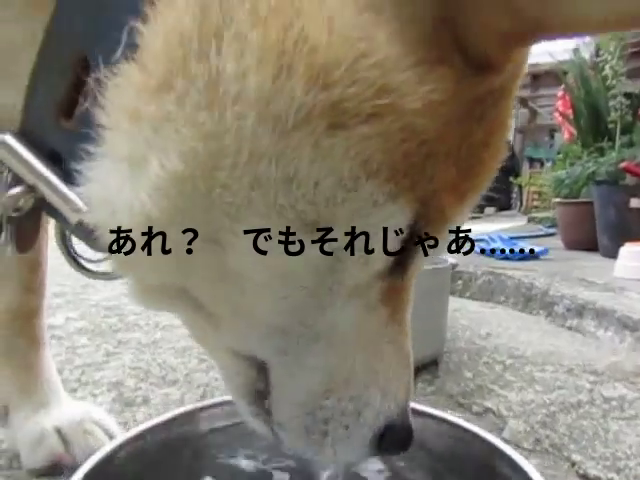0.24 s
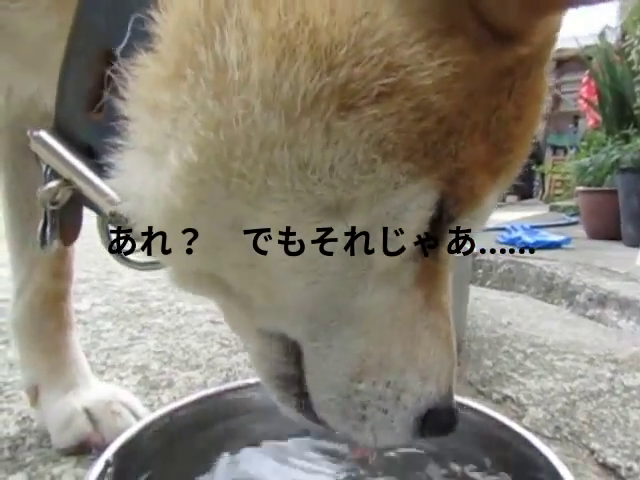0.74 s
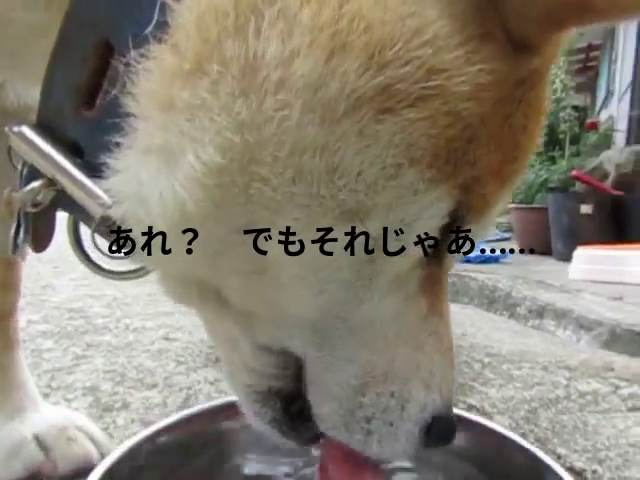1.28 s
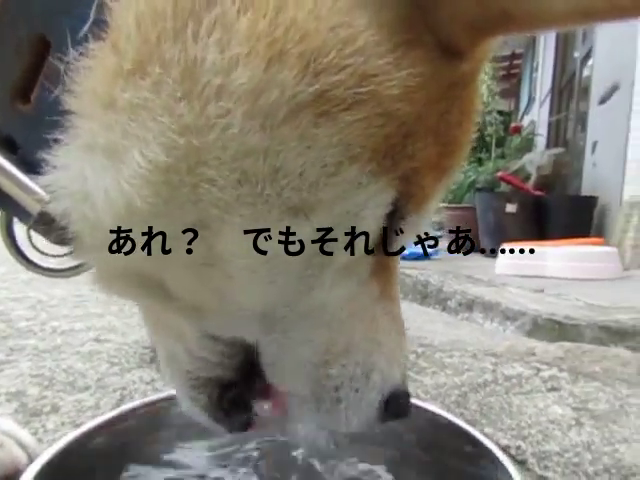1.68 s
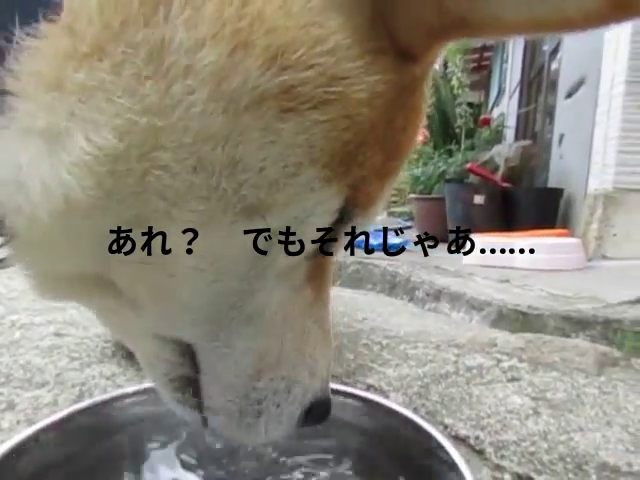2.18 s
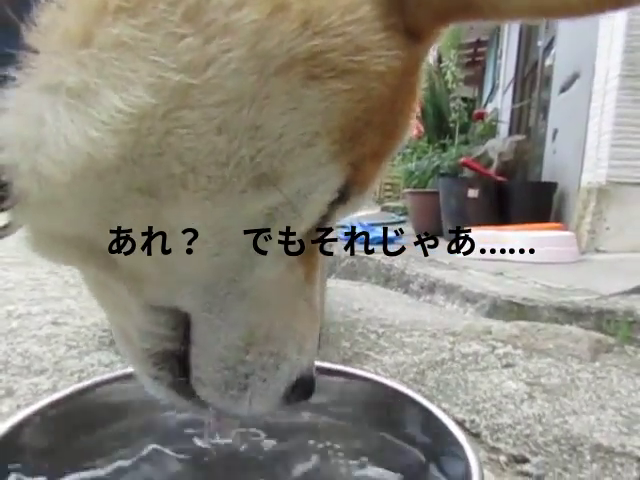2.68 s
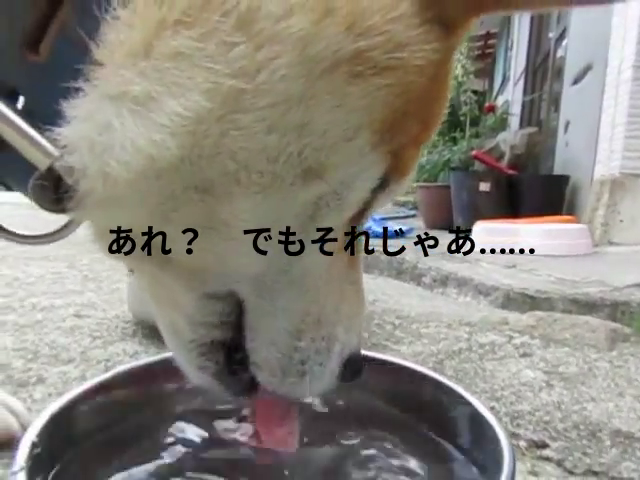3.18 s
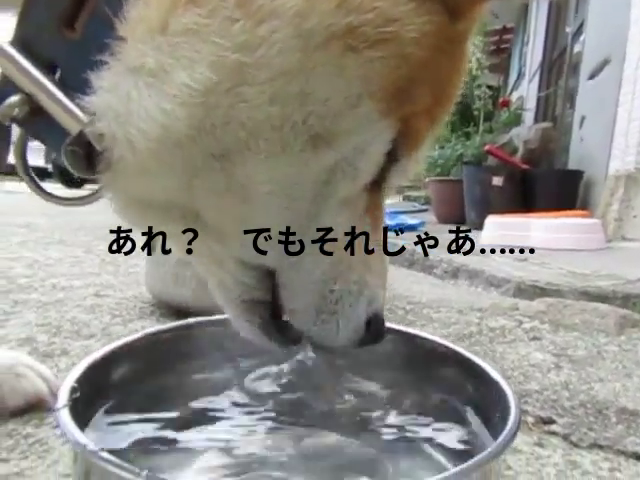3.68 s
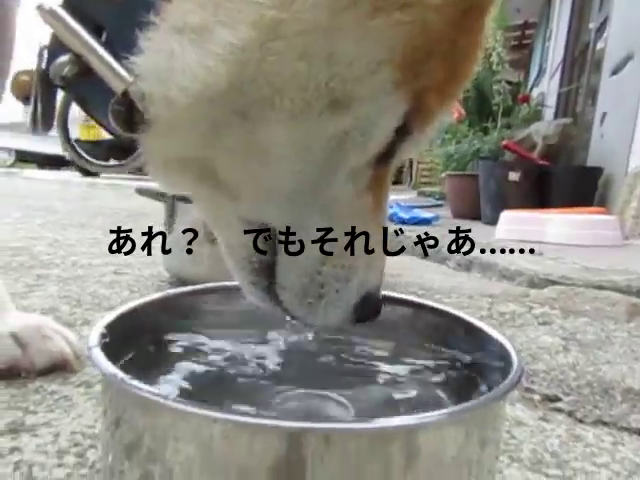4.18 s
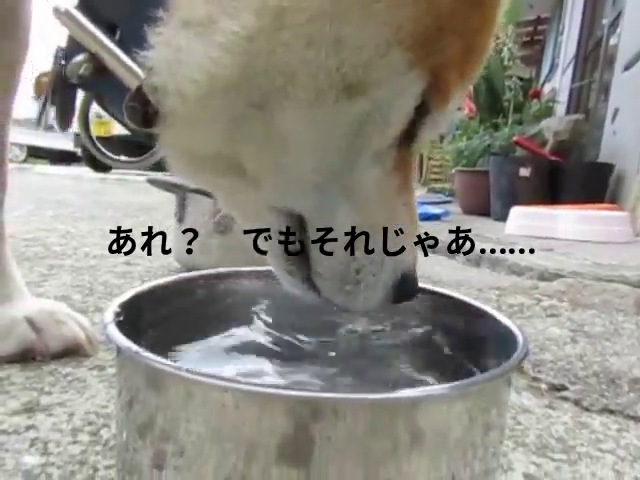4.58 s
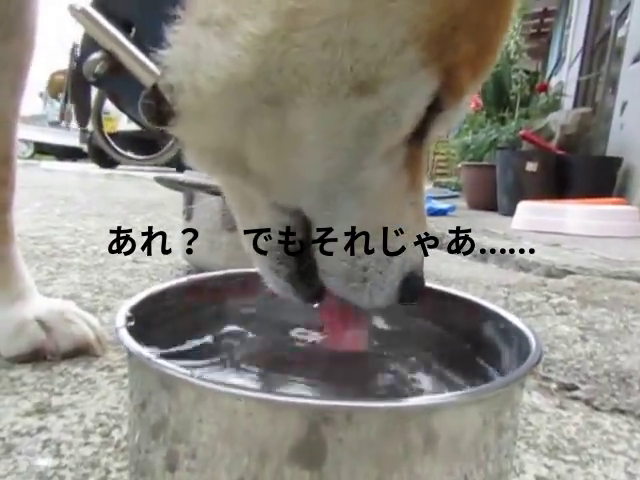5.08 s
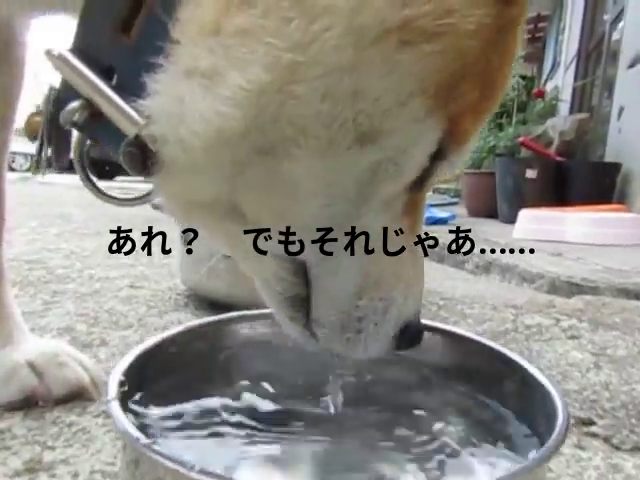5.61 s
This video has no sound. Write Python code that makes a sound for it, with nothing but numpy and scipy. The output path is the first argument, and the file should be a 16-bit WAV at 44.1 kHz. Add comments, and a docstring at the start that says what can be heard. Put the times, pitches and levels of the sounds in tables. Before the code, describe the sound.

After a brief silence, about fifteen quick laps of water run through to the end, close and dry. Small bubbles fizz and larger ones pop at each double-beat of tongue and jaws, coloured by the bowl. Bright stray-drop ticks appear from the second second onward, with faint high clinks, slight nasal whistles and low background hum.

```python
"""A dog laps water from a steel bowl on a concrete yard, heard close up.
Each lap is a dip of the tongue, a lift and a snap of the jaws: swarms of small decaying sine bubbles,
with a few large ones plopping out, and quick echoes and a short ring from the bowl.
Stray drops tick as coloured noise bursts, metal clinks faintly as decaying modes, and thin airy whistles
of resonant noise come and go over an outdoor hush of shaped noise with a low hum and a faint high whine."""
import sys
import numpy as np
from scipy import signal
from scipy.fft import rfft, irfft
from scipy.io import wavfile
from scipy.ndimage import uniform_filter1d

SR = 44100
rng = np.random.default_rng(int(sys.argv[2]) if len(sys.argv) > 2 else 0)


def generate_wav(sig):
    """Save sig (samples, or channels by samples) to the path in sys.argv[1] as 16-bit PCM at SR."""
    pcm = np.round(np.clip(np.atleast_2d(sig).T, -1, 1) * 32767).astype(np.int16)
    wavfile.write(sys.argv[1], SR, pcm)


N = 257984  # samples


def amp(db):
    """Decibel law: level to amplitude ratio."""
    return 10 ** (np.asarray(db) / 20)


def unit_rms(x):
    """Power normalisation: scales a signal to an rms of 1."""
    return x / np.sqrt(np.mean(x ** 2) + 1e-20)


def read(points, hz):
    """Log-frequency interpolation: joins the points of a short spectrum by straight lines."""
    point_hz, value = np.transpose(points)
    return np.interp(np.log(hz + 1), np.log(point_hz + 1), value)


def add(mix, start_s, sound):
    """Superposition: sums a sound into the mix from its start time."""
    part = mix[max(round(start_s * SR), 0):][:len(sound)]
    part += sound[:len(part)]


def coloured(x, points):
    """Linear filtering: weights the spectrum of a sound by the levels of the points."""
    hz = np.fft.rfftfreq(len(x), 1 / SR)
    return irfft(rfft(x) * amp(read(points, hz)), len(x))


def drift(rate_hz):
    """Random modulation: low-passed noise gives a slow fluctuation of rms 1."""
    hz = np.fft.rfftfreq(N, 1 / SR)
    smoothed = rfft(rng.standard_normal(N)) * np.exp(-(hz / rate_hz) ** 2)
    return unit_rms(irfft(smoothed, N))


# shape of the outdoor hush: (frequency [Hz], relative density [dB per Hz])
HUSH_SPECTRUM = [(20, -22), (45, -9), (100, -3), (160, 0.5), (340, -3.5), (750, -10.5), (1300, -8.5),
                 (2300, -11.5), (6400, -23.5), (8200, -22.5), (10300, -22), (13200, -23.5), (15000, -32.5)]
HUSH_DB = -46  # rms
# steady tones, low hum and high whine: (frequency [Hz], mean rms level [dB])
HUM_TONES = [(100, -55), (10893, -73.5)]


def yard(swell_db=0.32, waver_db=1.0, wander=0.00183):
    """Ambient noise: a shaped-noise hush, with a hum and a whine that waver in level and pitch."""
    level = amp(HUSH_DB + swell_db * drift(1.7))
    hush = level * unit_rms(coloured(rng.standard_normal(N), HUSH_SPECTRUM))
    time = np.cumsum(1 + wander * drift(42)) / SR  # one clock shared by both tones
    hum = np.zeros(N)
    for hz, db in HUM_TONES:
        hum += amp(db + waver_db * drift(6.8)) * np.sqrt(2) * np.sin(2 * np.pi * hz * time)
    return hush + hum


# laps of the tongue: (touch of the water [s], delay to the lift [s], delay to the bite [s],
#   dip level [dB], lift level [dB], bite level [dB], extra small bubbles [dB], pitch of pocket under tongue [Hz])
LAP_TIMES = [(0.13, 0.043, 0.13, -32.5, -40, -32.5, 0.5, 1690),
             (0.603, 0.047, 0.12, -35, -43.5, -35.5, 0.5, 1620.0),
             (0.935, 0.054, 0.16, -41, -42, -33, 1, 2000),
             (1.33, 0.089, 0.14, -30.5, -36.5, -40.5, -5.5, 1510),
             (1.697, 0.038, 0.12, -37.5, -41, -33.5, 2.0, 1490),
             (2.068, 0.054, 0.12, -36.5, -42, -34.5, -0.5, 1600.0),
             (2.436, 0.045, 0.12, -43, -38.0, -32, -1.0, 1900.0),
             (2.91, 0.058, 0.13, -38.5, -43.5, -36.0, 0.0, 1800),
             (3.269, 0.071, 0.12, -36.5, -41.0, -38.0, 1.0, 1700.0),
             (3.64, 0.07, 0.13, -35.0, -40.5, -37, -0.5, 3090),
             (3.981, 0.067, 0.136, -38.0, -37.5, -34.5, -4, 1600),
             (4.47, 0.088, 0.14, -36.5, -42.5, -38.5, 0, 840.0),
             (4.803, 0.039, 0.12, -33.5, -39.5, -35.0, -0.5, 1900),
             (5.149, 0.036, 0.12, -43, -38.5, -33.0, 0.5, 840),
             (5.518, 0.041, 0.116, -45.5, -42.5, -37.5, -1.0, 2000.0)]
# stirring by each part of a lap, rise and fall being times to 1/e of the peak power (sign ignored):
# (rise [s], fall [s], large bubbles [dB], medium bubbles [dB], small bubbles [dB])
DIP_STIR = (.006, .016, -7, -1.2, -5.5)
LIFT_STIR = (0.0263, 0.0629, -4, 0.24, -3)
BITE_STIR = (0.0155, 0.012, -0.5, 1.6, -5.5)
SETTLE_STIR = (-0.06, .07, -18, -16.5, -25)
DIP_PEAK_S, SETTLE_S = 0.0041, 0.07  # dip peak after the touch, falling water after the bite


def stirring(entry=2.5, settle=1.6):
    """Energy input: bubble power in three sizes as the tongue dips and lifts water, jaws bite, the rest falls."""
    t, power = np.arange(-SR // 4, SR // 2) / SR, np.zeros((3, N))
    for start, lift_s, close_s, dip_db, lift_db, bite_db, fizz_db, _ in LAP_TIMES:
        bite_at = start + close_s
        parts = [(start + DIP_PEAK_S, dip_db, DIP_STIR), (start + lift_s, lift_db, LIFT_STIR),
                 (bite_at, bite_db, BITE_STIR), (bite_at + SETTLE_S, bite_db, SETTLE_STIR)]
        for peak_s, db, (rise_s, fall_s, large_db, medium_db, small_db) in parts:
            before, after = abs(t / rise_s) ** entry, abs(t / fall_s) ** settle
            swell = np.exp(-np.where(t < 0, before, after))[t >= -peak_s]
            for band, size_db in zip(power, (large_db, medium_db, small_db + fizz_db)):
                add(band, peak_s + t[0], amp(db + size_db) ** 2 * swell)
    return power


def bubble(hz, decay_ms, rise, onset_ms):
    """Bubble resonance: a pocket of air rings and dies, its pitch rising (share per s). Envelope peak 1."""
    t = np.arange(SR // 25) / SR
    ms = t * 1000
    shape = np.exp(-ms / decay_ms) * (1 - np.exp(-ms / onset_ms))
    return shape / shape.max() * np.sin(2 * np.pi * hz * t * (1 + rise * t / 2))


def swarm(power, rate, low_hz, high_hz, spread_db=6.0, ring_ms=3.1, rise=29.0, onset_ms=0.037):
    """Random arrivals: bubbles born by chance share a given power; higher ones tend to die sooner."""
    out = np.zeros(N)
    born = np.flatnonzero(rng.random(N) < rate / SR)
    for i, (pick, damping, glide, big, side) in zip(born, rng.random((N, 5))[born]):
        hz = low_hz + (high_hz - low_hz) * pick
        decay_ms = ring_ms * (.4 + damping) * (hz / 1000) ** -.6
        grain = bubble(hz, decay_ms, rise * glide, onset_ms)
        size = amp(spread_db * (min(-np.log(big), 3) - 1.62))  # most are weak, a few stand out
        share = np.sqrt(power[i] * SR / rate[i])  # fewer bubbles carry more each
        add(out, i / SR, np.sign(side - .5) * size * share * grain / np.linalg.norm(grain))
    return out


# large, medium and small bubbles: (lowest pitch [Hz], highest pitch [Hz], level between laps [dB])
FROTH_SIZES = [(235, 1142, -57.5), (1190, 3360, -60), (3174, 7020, -65.5)]
# finest droplets: (lowest pitch [Hz], highest pitch [Hz], level against the small-bubble stirring [dB])
FINE_SPRAY = (6860, 10830, -11)


def froth(per_s=380., idle_per_s=120., level_db=-1.5):
    """Bubble-cloud noise: swarms of three sizes, thick in each lap and sparse between, and a fine spray."""
    out = np.zeros(N)
    for stir, (low_hz, high_hz, idle_db) in zip(stirring(), FROTH_SIZES):
        rate = idle_per_s + per_s * stir / (stir + amp(idle_db + 10) ** 2)  # saturates when stirred hard
        out += swarm(stir * amp(level_db) ** 2 + amp(idle_db) ** 2, rate, low_hz, high_hz)
    low_hz, high_hz, spray_db = FINE_SPRAY
    # stir and rate still hold the small bubbles: spray flies as they form
    return out + swarm(stir * amp(spray_db) ** 2, rate / 2, low_hz, high_hz)


# air between water, steel wall and muzzle: (frequency [Hz], width [Hz], level [dB])
CAVITY_MODES = [(738, 245, -9), (2000, 2400, -8)]


def cavity(x):
    """Cavity resonance: the air in the bowl rings with the bubbles and gives them a hollow tone."""
    hollow = np.zeros(N)
    for hz, width_hz, db in CAVITY_MODES:
        b, a = signal.iirpeak(hz, hz / width_hz, fs=SR)
        hollow += amp(db) * signal.lfilter(b, a, x)
    return x + hollow


# pocket in the closing mouth: (level against the bite [dB], median pitch [Hz], decay time [ms])
MOUTH_POCKET = (9.6, 584, 1.16)
POP_SPREAD = 0.12  # spread of its log pitch from lap to lap
DIP_POP_DB, DIP_POP_MS = 12, 3.3  # pocket under the tongue: level against the dip, decay time


def lap_pops():
    """Air entrainment: each lap traps one pocket at the dip and one at the bite; rows like LOUD_BUBBLES."""
    rows, (pop_db, pop_hz, pop_ms) = [], MOUTH_POCKET
    for start, _, close_s, dip_db, _, bite_db, _, dip_hz in LAP_TIMES:
        rows.append((start, dip_db + DIP_POP_DB, dip_hz, DIP_POP_MS))
        mouth_hz = pop_hz * np.exp(POP_SPREAD * rng.standard_normal())
        rows.append((start + close_s, bite_db + pop_db, mouth_hz, pop_ms))
    return rows


# loudest single bubbles and wet pops: (time [s], level of the main ring [dB], starting pitch [Hz], decay time [ms])
LOUD_BUBBLES = [(0.142, -20, 1840, 4.5), (0.243, -13.5, 2900, 0.33), (0.249, -12.5, 1670, 0.84),
                (0.7023, -21, 1830, 1.6), (0.804, -28.5, 378, 1.5), (0.8593, -28, 390, 1.8),
                (1.0378, -12, 2320, 2.3), (1.0702, -13.5, 2280, 3.5), (1.1281, -17, 1450, 1.3),
                (1.341, -11.5, 1890, 2.2), (1.4074, -18, 1590, 0.57), (1.4285, -3.5, 2170, 1.16),
                (1.7881, -24, 732, 5.7), (1.7898, -15, 1807, 4.3), (1.7982, -18, 5620, 1.3),
                (2.0865, -10.5, 1760, 0.89), (2.138, -21, 4950, 0.75), (2.1447, -16.5, 752, 6.7),
                (2.1574, -10, 1730, 2.4), (2.1754, -12, 3140, 0.22), (2.1905, -19, 2314, 4.2),
                (2.2036, -10, 2270, 0.57), (2.5259, -8.5, 2320, 1.9), (2.5753, -20, 1620, 2.1),
                (2.666, -28.5, 537, 2.2), (2.9804, -21.5, 5500, 1.3), (2.9909, -22.5, 4080, 1.6),
                (3.046, -10.5, 3020, 0.14), (3.356, -26, 1870, 6.6), (3.718, -19, 860, 4.6),
                (3.768, -12.5, 1800, 0.27), (3.839, -26, 337, 1.5), (4.014, -22.5, 3960, 2.1),
                (4.054, -22.5, 1520, 3.3), (4.0623, -16.5, 830, 3.6), (4.078, -11.5, 2600, 0.72),
                (4.1148, -9, 2770, 1.1), (4.1959, -26, 378, 17), (4.215, -24.5, 1690, 1.2),
                (4.8598, -22.5, 748, 4.8), (4.9186, -15.5, 1980, 0.34), (5.2208, -14.5, 3340, 0.64),
                (5.2497, -12.5, 5050, 0.33), (5.2495, -20, 1700, 1.9), (5.2824, -19, 634, 2),
                (5.599, -14.5, 833, 6), (5.5998, -12, 3160, 1.6), (5.6007, -23, 5190, 3.6)]


def plops(rise=12.1, snap_db=-24, snap_s=0.0018, overtone_db=-19, onset_ms=0.31):
    """Bubble pinch-off: each large bubble starts with a tiny snap and rings with a weak overtone."""
    out, t = np.zeros(N), np.arange(SR // 25) / SR
    for s, db, hz, decay_ms in LOUD_BUBBLES + lap_pops():
        glide = rise * rng.uniform(0.069, 2.0)
        overtone_hz = min(hz * rng.uniform(1.7, 2.6), SR / 3)
        overtone = bubble(overtone_hz, decay_ms, glide, onset_ms)
        ring = bubble(hz, decay_ms, glide, onset_ms) + amp(overtone_db) * overtone
        dull_noise = signal.lfilter([1], [1, -.8], rng.standard_normal(len(t)))
        snap = unit_rms(dull_noise) * np.exp(-t / snap_s)
        add(out, s, amp(db) * (ring + amp(snap_db) * snap))
    return out


# ring of the bowl: (frequency [Hz], time to decay by 60 dB [s])
BOWL_DECAY = [(300, 0.02), (900, 0.13), (2200, 0.037), (6000, 0.032), (14000, 0.008)]


def bowl(x, echo_db=-14, first_s=.0008, last_s=0.00374, tail_db=-21, count=6):
    """Early reflections and reverberation: steel wall and muzzle give quick echoes and a short ring."""
    size = SR // 4
    hz, t, noise = signal.stft(rng.standard_normal(size), SR, nperseg=256)
    decay = np.exp(-np.log(1000) * t / read(BOWL_DECAY, hz)[:, None])
    tail = signal.istft(noise * decay, SR, nperseg=256)[1][:size]
    tail = tail * np.minimum(np.arange(size) / (SR * last_s), 1)  # builds up over the echoes
    echoes = np.zeros(size)
    places = (SR * rng.uniform(first_s, last_s, count)).astype(int)
    echoes[places] = rng.choice([-1, 1], count) / np.sqrt(count)
    response = amp(echo_db) * echoes + amp(tail_db) * tail / np.linalg.norm(tail)
    return signal.fftconvolve(x, response)[:N]


# thin airy whistles: (start [s], length [s], rms level before the swell [dB],
#   first pitch [Hz], middle pitch [Hz], last pitch [Hz])
WHISTLE_GLIDES = [(0.137, 0.1, -54, 6300, 7400, 7200), (0.277, 0.13, -57, 5100, 5670, 6000),
                  (0.492, 0.21, -53, 6440, 7270, 6900), (1.513, 0.13, -51, 3560, 3560, 3470),
                  (2.894, .2, -49.5, 4400, 4960, 4500), (3.248, 0.23, -50, 4400, 4960, 4850),
                  (3.596, 0.18, -48, 4190, 4900, 5200), (5.054, 0.11, -48, 1660, 1730, 1730),
                  (5.091, 0.2, -46, 3620, 4080, 3860), (5.297, 0.17, -48.5, 3235, 2570, 2130)]


def whistles(width_hz=26.0, blur=0.95):
    """Resonant filtering: noise in one gliding resonance, perhaps the dog's nose, broader for wider glides."""
    out = np.zeros(N)
    for s, length, db, first, middle, last in WHISTLE_GLIDES:
        u = np.linspace(0, 1, round(length * SR))
        hz = np.polyval(np.polyfit([0, .5, 1], [first, middle, last], 2), u)
        radius = np.exp(-np.pi * (width_hz + blur * abs(middle - first)) / SR)  # of the double pole
        noise = rng.standard_normal(len(u)) + 1j * rng.standard_normal(len(u))
        air = signal.lfilter([1], np.poly([radius, radius]), noise)
        tone = unit_rms((air * np.exp(2j * np.pi * np.cumsum(hz) / SR)).real)  # shifted up to the pitch
        add(out, s, amp(db) * tone * np.sin(np.pi * u))
    return out


# small metal parts touching: (time [s], relative level [dB])
CLINK_TIMES = [(0.3182, -36), (0.5395, -31), (1.1303, -40), (2.0318, -40), (2.0887, -38), (2.6758, -35),
               (2.8873, -43), (3.316, -38), (5.473, -33), (5.6357, -24)]
# modes of the metal: (frequency [Hz], relative level [dB], time to decay by 60 dB [s])
METAL_MODES = [(11294, -14.5, 0.18), (12700, -2.5, 0.1), (13700, -14.5, 0.099), (13700, -12, 0.082)]


def clinks(level_db=-8.5, onset_s=0.0014, uneven_db=0.5, waver=0.91):
    """Modal vibration: light touches ring the high modes of a small metal piece, with a chattering level."""
    out, t = np.zeros(N), np.arange(SR // 4) / SR
    for s, db in CLINK_TIMES:
        for hz, mode_db, t60 in METAL_MODES:
            chatter = 1 + waver * unit_rms(uniform_filter1d(rng.standard_normal(len(t)), size=200))
            envelope = np.exp(-np.log(1000) * t / t60) * (1 - np.exp(-t / onset_s))
            ring = envelope * np.sin(2 * np.pi * (hz * t + rng.random()))
            level = amp(db + level_db + mode_db + uneven_db * rng.standard_normal())
            add(out, s, level * chatter * ring)
    return out


# stray drops landing on something hard: (time [s], peak level [dB])
TICK_TIMES = [(1.5333, -29), (1.815, -22), (1.9063, -27.5), (2.4748, -33), (2.552, -27), (3.8416, -24),
              (4.1874, -24.5), (4.686, -20), (4.8216, -26), (5.011, -20), (5.182, -26), (5.3634, -20.5)]
# their colour: (frequency [Hz], relative level [dB])
TICK_SPECTRUM = [(300, -14), (1500, 1.5), (4500, -2), (9500, 6.5), (13000, 5.5), (16000, -17)]


def ticks(decay_s=0.0014, tail_db=-19, tail_s=0.0052):
    """Impact noise: a flung drop lands with a bright crack and a short spatter."""
    out, t = np.zeros(N), np.arange(SR // 25) / SR
    for s, db in TICK_TIMES:
        envelope = np.exp(-t / decay_s) + amp(tail_db) * np.exp(-t / tail_s)
        crack = coloured(rng.standard_normal(len(t)), TICK_SPECTRUM) * envelope
        add(out, s, amp(db) * crack / abs(crack).max())
    return out


def scene(low_cut_hz=100.0):
    """Radiation and superposition: bubbles are too small to radiate deep bass; the bowl reflects them."""
    low_cut = signal.butter(1, low_cut_hz, "high", fs=SR, output="sos")
    water = signal.sosfilt(low_cut, plops() + cavity(froth()))
    return (water + bowl(water) + ticks() + clinks() + whistles() + yard())[None]


START_S, FADE_S = 0.1102, 0.0036  # silence before the sound, and its fade-in
EDGE_HZ = 15300  # upper band limit


def record(dry):
    """Band limitation: the sound opens after a moment of silence, then passes a steep low-pass."""
    opened = np.clip((np.arange(N) / SR - START_S) / FADE_S, 0, 1)
    low_pass = signal.firwin(301, EDGE_HZ, window=("kaiser", 8), fs=SR)
    return signal.oaconvolve(dry * opened, low_pass[None], "same")


dry = scene()
out = record(dry)
generate_wav(out)
```